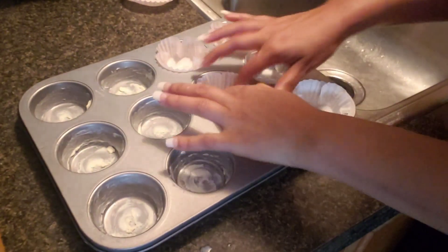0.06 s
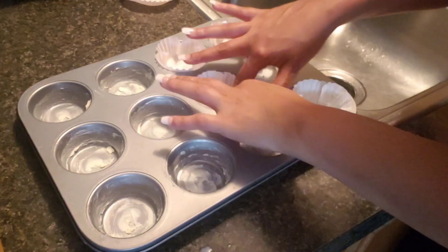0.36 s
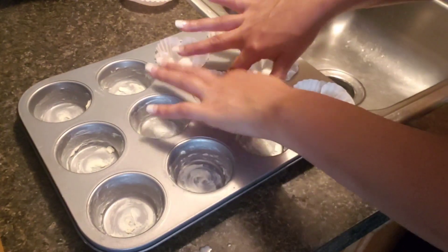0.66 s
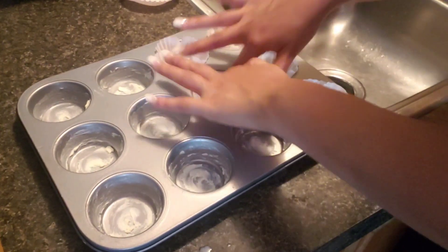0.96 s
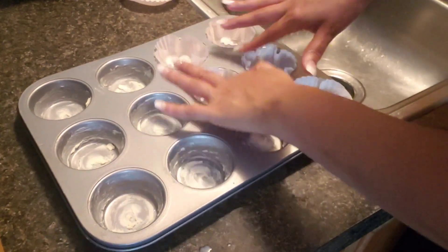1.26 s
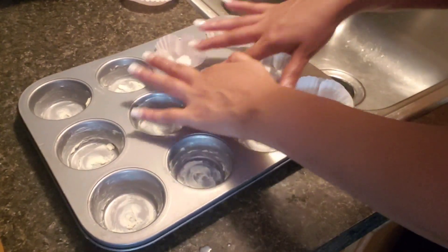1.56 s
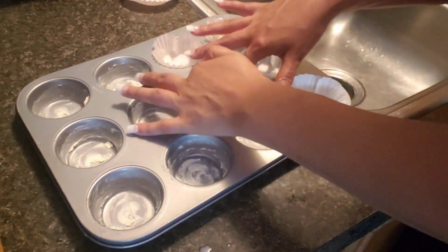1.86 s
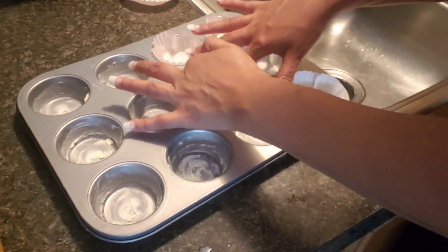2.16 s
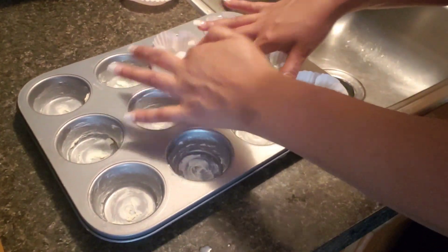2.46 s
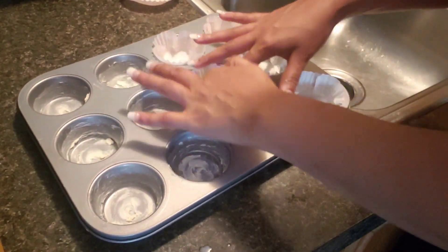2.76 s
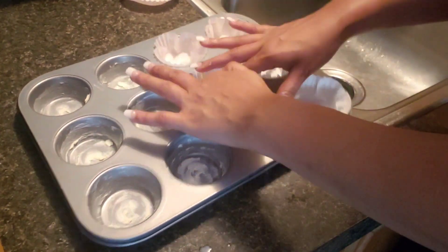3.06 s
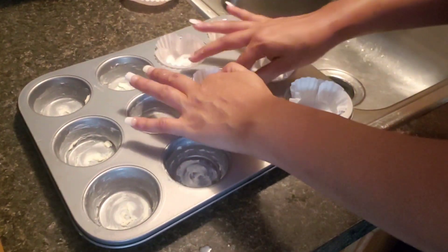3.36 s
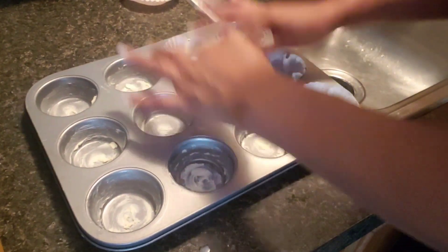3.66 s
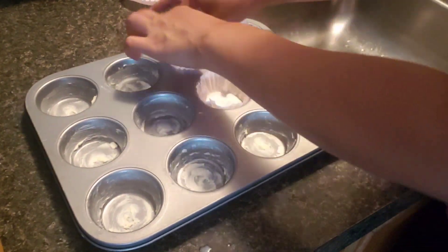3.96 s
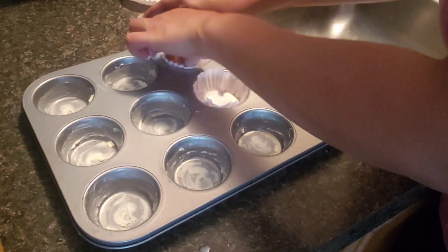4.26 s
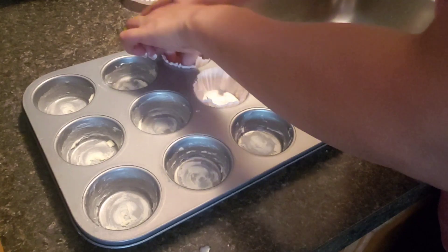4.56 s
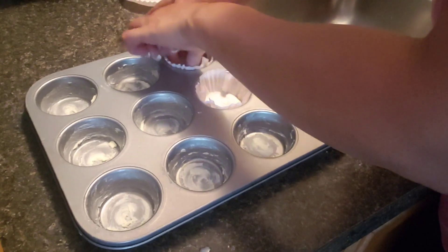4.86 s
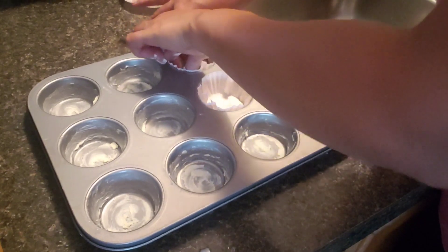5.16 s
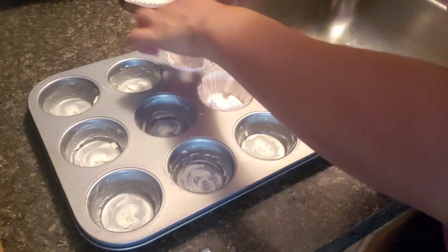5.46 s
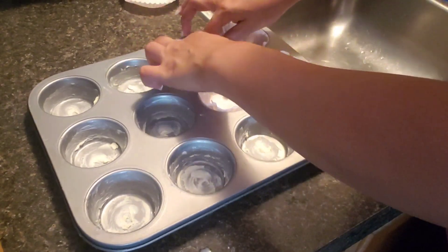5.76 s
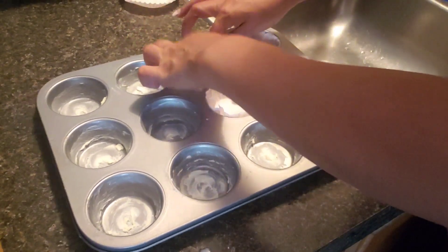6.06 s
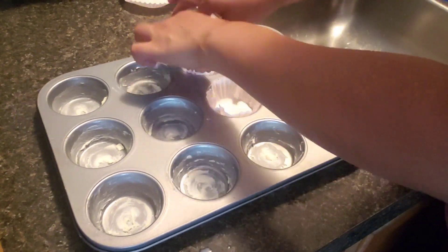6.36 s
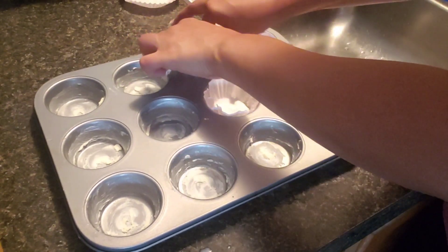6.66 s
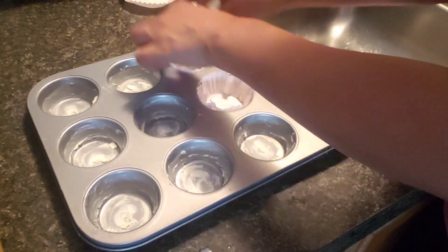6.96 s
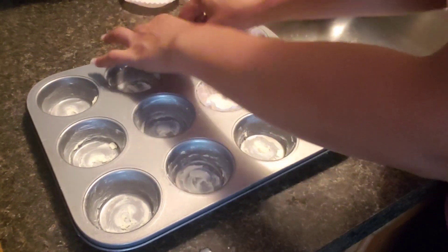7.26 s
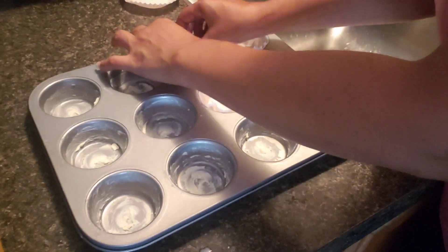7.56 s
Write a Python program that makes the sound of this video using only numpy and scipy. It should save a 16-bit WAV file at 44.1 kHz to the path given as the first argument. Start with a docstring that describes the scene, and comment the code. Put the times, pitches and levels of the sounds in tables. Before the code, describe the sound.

Pleated paper liners are pressed into a metal muffin tin, heard close up in a small kitchen. From the start, short, soft rustles and crisp snaps come irregularly, mixed with fingertips rubbing the metal and a few faint bumps and taps. Sharper snaps stand out at about 0.8, 2.4 and 3.4 seconds. After a brief lull, the paper gets louder and busier from 4 seconds. At 4.7 seconds the tin gives its strongest knock on the counter, dull and briefly ringing, together with a sharp crackle. Smaller knocks follow around 5 seconds, then a quick run of tiny paper ticks. Another cluster of crinkles and knocks comes between 5.6 and 6 seconds. Fingernails tap the tin several times from 6.4 to 6.9 seconds, and more crackling continues until the end at about 7.7 seconds. A faint, steady low appliance hum lies underneath throughout.

```python
"""Paper liners in a muffin tin

Hands press pleated liners into a metal tin on a kitchen counter. The pleats buckle with a snap and
the paper rustles by stick-slip friction; fingers rub, knock and tap the tin, whose modes ring briefly.
An appliance hums in the small, hard room, and two microphone ports each add their own resonances."""
import sys
import numpy as np
from scipy import signal
from scipy.fft import rfft, irfft, next_fast_len
from scipy.io import wavfile

SR = 44100
rng = np.random.default_rng(int(sys.argv[2]) if len(sys.argv) > 2 else 0)


def wav_record(signal):
    """Record a signal, one row per channel, as 16-bit PCM in the file named by sys.argv[1]."""
    frames = np.transpose(np.atleast_2d(signal))
    bounded = np.clip(frames, -1, 1)
    # unit amplitude maps onto the largest positive 16-bit level
    quanta = np.round(bounded * 32767).astype(np.int16)
    wavfile.write(sys.argv[1], SR, quanta)


N = 340011

# Spectrum of contact noise on the tin. Each row: frequency in Hz, gain in dB.
CONTACT_SPECTRUM = [(150, -26.5), (500, -3.5), (800, -6), (1200, 0), (1700, -5), (2600, -9), (7000, -20)]


def snap(db, pitch_hz, cup_db, crisp_db):
    """Buckling: a pleat gives way, flutters at its own resonance and sounds the hollow of the cup."""
    t = np.arange(SR // 16) / SR
    t60_s, rise_s = 0.023, 0.0004
    envelope = amp(-60 * t / t60_s) * (1 - np.exp(-t / rise_s))
    jerks = amp(4 * rng.standard_normal(len(t) // 16 + 1)).repeat(16)[:len(t)]
    flutter = unit(envelope * jerks * rng.standard_normal(len(t)))
    resonance = signal.lfilter(*signal.iirpeak(pitch_hz, Q=3.37, fs=SR), flutter)
    colour = [(200, cup_db - 10), (750, cup_db - 1.5), (1220, cup_db + 15),
              (1900, -2.5), (7000, -2.5), (10500, crisp_db + 1)]
    return amp(db - 16.5) * coloured(flutter + amp(5) * resonance, colour)


def snaps():
    """Single pleats buckle under load, each releasing its elastic energy as a short transient."""
    # Each row: start in seconds, level in dB, pleat pitch in Hz, hollow cup tone in dB, crisp edge in dB.
    bucklings = [(0.1404, -26, 6000, -18, 3.5), (0.3646, -32, 5000, -36, -6), (0.4562, -36, 5330, -6, 5.5),
                 (.5946, -36, 4960, -29, -3), (.617, -31, 5330, -45, -3), (0.7475, -23, 3600, -23, -9),
                 (.7585, -15, 5540, -29, -5), (0.821, -28, 4820, -36, -2.5), (1.2398, -37.5, 5200, -27, 3),
                 (1.258, -27, 4800, -30, -1), (1.685, -29, 5000, -16, -2.5), (1.7418, -20, 5530, -18, -7.5),
                 (1.7644, -33.5, 5300, -14, 2), (2.0864, -28.5, 5540, -22, 1.5),
                 (2.2564, -33, 5360, -7, 8.5), (2.2953, -24, 3350, -20, -7), (2.388, -35, 3000, -28, -2),
                 (2.4056, -15.5, 2940, -6.5, 0.5), (2.724, -21, 4240, -26, -5),
                 (2.826, -26.5, 3280, -19, -5), (3.0617, -21.5, 3350, -11.5, 0),
                 (3.2032, -38, 3400, -16, 4.5), (3.3683, -12, 5060, -57, -7), (3.376, -19, 3750, -30.5, -6),
                 (3.4155, -23.5, 3900, -21, -3.5), (3.49, -29, 4100, -45, -2.5),
                 (3.5436, -31.5, 4000, -23, -18), (3.9579, -43.5, 5400, -19, 13),
                 (3.9745, -25, 5400, -37, -4), (4.061, -13.5, 4760, -7.5, -8),
                 (4.0832, -17.5, 4600, -15, -3), (4.2472, -22.5, 2710, -12, -19),
                 (4.4947, -20, 3660, -15, -21), (4.6196, -19.5, 4800, -37, 0.5),
                 (4.702, -12.5, 5000, -18, 4), (4.805, -15.5, 3030, -20, 2.5), (4.9448, -23, 3700, -42, -2),
                 (4.9887, -28, 3700, -25, -11), (5.021, -28, 3470, -39, -16), (5.3344, -19, 2820, -21, -8),
                 (5.3528, -27.5, 4360, -41, -2), (5.575, -31, 4540, -30, 1), (5.654, -18.5, 3700, -20, 1),
                 (5.6805, -20, 5100, -18, -26), (5.7036, -15, 4770, -17, -11), (5.8147, -24, 5220, -55, -9),
                 (5.8355, -21.5, 5600, -30, 0.5), (6.0278, -28, 5100, -39, -2.5),
                 (6.142, -34, 5030, -30, 2), (6.35, -44.5, 5040, -13, 3.5), (6.4484, -18.5, 5500, -7, 2.5),
                 (6.496, -21.5, 5200, -9, 3), (6.515, -25, 5140, -24, -1.5),
                 (7.3158, -23.5, 5350, -4.5, -4), (7.3507, -25, 4010, -30, -3), (7.403, -19, 5830, -17, -2),
                 (7.4541, -22, 6000, -40, -1.5)]
    out = np.zeros(N)
    for start, *pleat in bucklings:
        add(out, start, snap(*pleat))
    return out


def pleat_run(count):
    """A nearly periodic pulse train: a finger ticks across one pleat after another."""
    out = np.zeros(N)
    first_s, step_s = 5.075, 0.034
    for k, (late, louder, higher) in enumerate(2 * rng.random((count, 3)) - 1):
        tick = snap(db=-36.5 + 2 * louder, pitch_hz=3650 * (1 + 0.12 * higher), cup_db=-9, crisp_db=-4)
        add(out, first_s + step_s * (k + 0.1 * late), tick)
    return out


def slips():
    """Stick-slip friction: paper fibres catch and slip in clumps, and small creases tick."""
    fibres = grains(rate=4000, spread_db=5.0) * amp(4.3 * wobble(260))
    creases = grains(rate=60, spread_db=5.5)
    return unit(fibres) + amp(-4) * unit(creases)


def rustles(force):
    """Friction drives the liner: a light touch stirs its thin edge, a firm press flexes its body too."""
    full_press_db = -42.5  # the whole liner flexes at this force
    edge = band(slips(), "high", edge_hz=4030)
    body = band(slips(), "low", edge_hz=3200) * (force / amp(full_press_db)) ** 0.44
    # Spectrum of the paper. Each row: frequency in Hz, gain in dB.
    paper_spectrum = [(200, -52.5), (700, -16), (1500, -3.5), (3000, 4), (6000, -0.5), (11000, -2),
                      (16000, -3.5)]
    return amp(-1) * force * unit(coloured(edge + body, paper_spectrum))


def stroke(length, rise_share):
    """Force envelope of one finger movement: it builds, holds and lets go."""
    t = np.arange(int((length + 0.05) * SR)) / SR
    release_s = 0.0081
    build = 1 - np.exp(-(t / (rise_share * length)) ** 2)
    return build / (1 + np.exp((t - length) / release_s))


def stroke_forces():
    """Sliding friction: each stroke drags a fingertip over the tin and, a little more slowly, the paper."""
    # Each row: start in seconds, length in seconds, paper rustle in dB, rub on the tin in dB.
    strokes = [(0.014, 0.064, -44.5, -67.5), (0.109, 0.097, -47.5, -50.5), (0.199, 0.17, -52, -54.5),
               (0.348, 0.1, -48.5, -54), (0.589, 0.11, -43.5, -71), (0.717, 0.13, -41.5, -53.5),
               (0.949, 0.055, -47, -62), (1.048, 0.11, -45.5, -56.5), (1.235, 0.065, -40.5, -51.5),
               (1.294, 0.067, -52.5, -55), (1.568, 0.098, -47, -70), (1.658, 0.11, -66, -52.5),
               (1.888, 0.19, -70, -59), (2.014, 0.11, -51, -56), (2.256, 0.17, -58.5, -51),
               (2.664, 0.086, -42.5, -63.5), (2.79, 0.074, -45.5, -62.5), (2.931, 0.1, -47, -70),
               (3.051, .12, -50.5, -50), (3.196, 0.039, -43.5, -62), (3.257, 0.068, -58, -84),
               (3.366, 0.12, -46, -59), (3.493, .11, -71, -51.5), (3.607, 0.069, -48, -57),
               (3.962, 0.13, -33.5, -48.5), (4.057, 0.079, -34, -45), (4.134, 0.17, -52, -53.5),
               (4.264, 0.075, -40, -45), (4.334, 0.16, -46, -52.5), (4.477, 0.073, -41, -47.5),
               (4.562, 0.088, -39.5, -54.5), (4.667, 0.065, -35, -52), (4.793, 0.12, -42, -50),
               (4.925, 0.05, -38, -49), (5.005, 0.32, -71, -54), (5.272, 0.095, -42, -60.5),
               (5.624, .11, -36.5, -48.5), (5.728, 0.19, -47, -60.5), (5.904, 0.11, -42.5, -47),
               (6.012, .15, -54, -48.5), (6.284, 0.045, -61, -62.5), (6.377, 0.044, -47.5, -57),
               (6.415, 0.13, -42, -53.5), (6.54, 0.082, -60, -55), (6.658, .13, -60.5, -53),
               (6.808, 0.066, -45.5, -51), (6.868, 0.082, -40, -45.5), (7.165, 0.12, -50, -56.5),
               (7.277, 0.15, -44, -51), (7.441, 0.11, -48, -54.5), (7.584, 0.15, -45.5, -57.5)]
    on_paper, on_tin = np.zeros((2, N))
    for start, length, paper_db, rub_db in strokes:
        add(on_paper, start, amp(paper_db) * stroke(length, rise_share=0.19))
        add(on_tin, start, amp(rub_db) * stroke(length, rise_share=0.16))
    return on_paper, on_tin


def tin_ring(thud_db, clank_db):
    """Modal vibration: the tin's modes, excited differently at each spot, decay under a resting hand."""
    # Modes of the tin on the counter. Each row: frequency in Hz, level in dB, free T60 in seconds.
    modes = [(60.6, -4, 0.31), (70.8, 2.5, 0.19), (90.8, -3.5, 0.49), (167, 5, 0.078), (233.3, 3, 0.12),
             (290.5, 3, 0.23), (350, -4.5, 0.35), (388.6, 0.5, 0.17), (452.6, -6.5, 0.23),
             (607, -7.5, 0.086), (661.3, 6, 0.18), (689, -7, 0.15), (809, -0.5, 0.11), (927, -3, 0.11),
             (951, -3, .17), (1023, 3.5, 0.12), (1137, -0.5, 0.054), (1285, 9, 0.066), (1300, -13.5, 0.056),
             (1338, -2, 0.079), (1450, -28, 0.099), (1636, -27.5, 0.14), (1680, 0.5, 0.35),
             (1735, -21.5, 0.27), (2130, -10.5, 0.11), (2340, 4, 0.23), (2820, -7, 0.21)]
    hz, db, free_t60 = np.transpose(modes)[:, :, None]
    t60 = np.minimum(free_t60, 170 / hz)  # the hand damps a mode within 170 cycles
    t = np.arange(SR // 5) / SR
    spot_db = rng.normal(0, 1.5, hz.shape)
    touch_db = along([(90, thud_db), (200, 0.011), (450, 0), (750, clank_db)], hz) + spot_db
    partials = np.sin(2 * np.pi * (hz * t + rng.random(hz.shape)))
    return np.sum(amp(db + touch_db - 60 * t / t60) * partials, axis=0)


def rubs(force):
    """Stick-slip excitation: fingertips catch and slide on the tin, shaking its modes."""
    friction = grains(rate=1500, spread_db=9.5) * amp(1.2 * wobble(70))
    skin = unit(coloured(friction, CONTACT_SPECTRUM))
    jolts = grains(rate=500, spread_db=2.5)
    ringing = unit(signal.fftconvolve(jolts, tin_ring(thud_db=0.5, clank_db=-5.5))[:N])
    return force * (amp(2.5) * skin + amp(-1) * ringing)


def knocks():
    """Impact of the tin on the counter: soft contact thuds, hard contact clanks and chatters."""
    # Each row: start in seconds, level in dB, hardness as the gain of the upper modes in dB.
    impacts = [(0.159, -40, -11), (1.099, -44.5, -19.5), (1.27, -44.5, -15), (1.434, -43, -12.5),
               (3.367, -40.5, -2.5), (3.989, -35.5, -7), (4.136, -36, -11.5), (4.51, -37.5, -5.5),
               (4.706, -20, -8), (4.931, -36, -4.5), (4.957, -30, -10.5), (5.7, -39, 1.5), (5.755, -42, -4),
               (5.814, -42, 0.5), (5.919, -29.5, -4.5), (6.708, -41.5, -7.5), (6.829, -42, -10),
               (7.19, -41.5, -11), (7.35, -43.5, -10)]
    out, t = np.zeros(N), np.arange(SR // 5) / SR
    onset = 1 - np.exp(-t / 0.0013)  # the pushing fingertip is soft
    for start, db, hard_db in impacts:
        noise = unit(coloured(rng.standard_normal(len(t)), CONTACT_SPECTRUM))
        chatter = noise * amp(hard_db + 7.5 - 60 * t / 0.1)
        ring = amp(-6) * tin_ring(thud_db=-10 - 1.12 * hard_db, clank_db=hard_db + 4)
        add(out, start, amp(db) * (ring + chatter) * onset)
    return out


def taps():
    """Damped oscillation: a fingernail strikes a cup wall, which the finger stills at once."""
    # Each row: start in seconds, level in dB, pitch in Hz.
    nail_strikes = [(1.1613, -46, 1070), (1.323, -47, 1070), (1.9083, -52, 970), (2.054, -45, 1270),
                    (2.274, -43, 1015), (2.36, -43, 960), (4.2857, -31, 1700), (6.448, -27, 1795),
                    (6.498, -33.5, 1880), (6.7084, -40, 1130), (6.8137, -32.5, 1244), (6.8557, -36.5, 1110),
                    (7.659, -44, 1350)]
    out, t = np.zeros(N), np.arange(SR // 16) / SR
    onset = 1 - np.exp(-t / 0.00047)
    for start, db, pitch_hz in nail_strikes:
        ring = np.sin(2 * np.pi * pitch_hz * t) * amp(-60 * t / 0.03)
        noise = unit(coloured(rng.standard_normal(len(t)), CONTACT_SPECTRUM))
        scrape = noise * amp(-11.5 - 60 * t / 0.023)
        add(out, start, amp(db + 8) * (ring + scrape) * onset)
    return out


def early_reflections(x):
    """Early reflections off tin, counter and sink, drawn afresh for each port every fifth of a second."""
    out, block, t = np.zeros((2, N)), SR // 5, np.arange(SR // 40) / SR
    for start in range(0, N, block):
        for track in out:
            echoes = rng.standard_normal(len(t)) * amp(-60 * t / 0.023)
            echoes /= np.linalg.norm(echoes)
            add(track, start / SR, signal.fftconvolve(x[start:start + block], echoes))
    return band(out, "high", edge_hz=840)


def reverberation(x):
    """The kitchen's short diffuse tail dies fastest in the treble; it is drawn afresh every half second."""
    # Each row: frequency in Hz, reverberation time T60 in seconds.
    decay_times = [(150, 0.56), (1000, 0.36), (6000, 0.35), (15000, 0.31)]
    out, block = np.zeros((2, N)), SR // 2
    for start in range(0, N, block):
        hz, t, noise = signal.stft(rng.standard_normal((2, SR // 3)), SR, nperseg=256)
        decay = amp(-60 * t / along(decay_times, hz)[:, None])
        tails = signal.istft(noise * decay, SR, nperseg=256)[1]
        for track, tail in zip(out, tails):
            diffuse = signal.fftconvolve(x[start:start + block], tail / np.linalg.norm(tail))
            add(track, start / SR + 0.004, diffuse)
    return band(out, "high", edge_hz=310)


def appliance_hum():
    """An appliance vibrates at harmonics of the mains frequency, wavering slightly."""
    # Each row: frequency in Hz, rms level in dB.
    harmonics = [(60, -65.5), (120, -52.5), (240, -79.5)]
    t = np.arange(N) / SR
    drift = 0.031 * wobble(1)
    return sum(np.sqrt(2) * amp(db + 0.27 * wobble(2.7)) * np.sin(2 * np.pi * hz * t + drift)
               for hz, db in harmonics)


def room_air():
    """Soft ambient noise, coherent between the ports in the bass and independent in the treble."""
    # Each row: frequency in Hz, gain in dB.
    air_spectrum = [(20, -2.5), (40, -7.5), (58, 7), (85, -5), (130, 1.5), (185, -7), (270, -0.5),
                    (450, -12.5), (700, -18.5), (1100, -18), (1700, -31), (5000, -30.5), (16000, -30)]
    bass = band(rng.standard_normal(N), "low", edge_hz=460)
    trebles = band(rng.standard_normal((2, N)), "high", edge_hz=610)
    return amp(-55.5) * np.array([unit(coloured(bass + treble, air_spectrum)) for treble in trebles])


def grains(rate, spread_db):
    """Shot noise of `rate` tiny slips a second: most are small, a few reach three spreads higher."""
    where, size, sign = rng.random((int(rate * N / SR), 3)).T
    size_db = 3 * spread_db * size ** 2
    return np.bincount((where * N).astype(int), np.sign(sign - 0.5) * amp(size_db), N)


def wobble(rate):
    """Random modulation: a curve through `rate` Gaussian knots a second."""
    knots = rng.standard_normal(int(N * rate / SR) + 2)
    return np.interp(np.arange(N) * rate / SR, np.arange(len(knots)), knots)


def amp(db):
    """Decibels as an amplitude ratio."""
    return np.exp(np.asarray(db) * (np.log(10) / 20))


def unit(x):
    """Normalisation to an rms of 1."""
    return x / np.sqrt(np.mean(x ** 2) + 1e-20)


def along(points, hz):
    """Interpolation of (Hz, value) points on a logarithmic frequency axis."""
    point_hz, values = np.transpose(points)
    return np.interp(np.log(hz + 1), np.log(point_hz + 1), values)


def coloured(x, points):
    """Minimum-phase filtering with the given (Hz, dB) gain."""
    size = 2 * next_fast_len((len(x) + SR // 16) // 2)
    gain = amp(along(points, np.fft.rfftfreq(size, 1 / SR)))
    cepstrum = irfft(np.log(gain))
    cepstrum[1:size // 2] *= 2  # folding onto positive time makes the filter causal
    cepstrum[size // 2 + 1:] = 0
    return irfft(rfft(x, size) * np.exp(rfft(cepstrum)), size)[:len(x)]


def band(x, kind, edge_hz):
    """Second-order low-pass or high-pass filtering."""
    return signal.sosfilt(signal.butter(2, edge_hz, kind, fs=SR, output="sos"), x)


def add(track, start_s, sound):
    """Superposition of a sound onto a track."""
    part = track[max(round(start_s * SR), 0):][:len(sound)]
    part += sound[:len(part)]


def scene():
    """Direct sound, reflections and background superpose at the left and right ports."""
    on_paper, on_tin = stroke_forces()
    paper = rustles(on_paper) + snaps() + pleat_run(count=5)
    tin = rubs(on_tin) + knocks() + taps()
    near = paper + tin
    lag_samples = 6  # the tin lies a little to the left, so the right port hears it later
    direct = amp(-1.5) * np.array([near, np.pad(near, (lag_samples, 0))[:N]])
    # Pleats face every way, so each port hears a partly different paper sound.
    spread = amp(-6) * np.outer([1, -1], rustles(on_paper) + snaps())
    reflected = amp(-5.5) * early_reflections(near)
    diffuse = reverberation(amp(-9) * paper + amp(-8) * tin)
    return direct + spread + reflected + diffuse + appliance_hum() + room_air()


def record(dry):
    """Cavity resonances colour each microphone port; band limits cut deep rumble and the top treble."""
    # Responses of the two ports. Each row: frequency in Hz, gain in dB.
    left_response = [(400, -1), (1300, 0), (2050, -9), (2950, -4), (3500, -4), (5300, 0.5), (5900, 7),
                     (6550, 8), (7200, 0), (8200, -6), (9400, 2.5), (10200, 1.5), (11000, 2),
                     (14500, -11.5)]
    right_response = [(100, -4.5), (250, -5), (400, -5.5), (700, -9.5), (1250, -17.5), (2000, -28.5),
                      (2900, -19.5), (3300, -22.5), (4200, -14), (7800, -10.5), (9000, -12), (11000, -4),
                      (12500, 2.5), (14000, -11.5)]
    ports = np.array([coloured(dry[0], left_response), coloured(dry[1], right_response)])
    ports = band(ports, "high", edge_hz=54)
    size, top_hz = next_fast_len(N + SR // 8), 16000
    passband = np.fft.rfftfreq(size, 1 / SR) < top_hz
    return irfft(rfft(ports, size) * passband, size)[:, :N]


dry = scene()
out = record(dry)
wav_record(out)
```